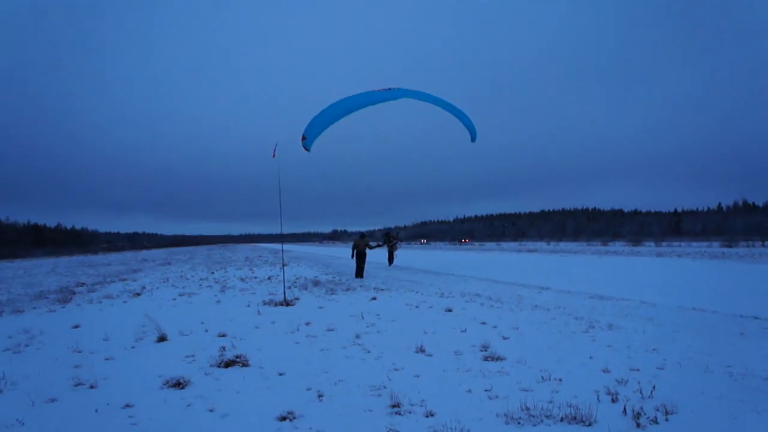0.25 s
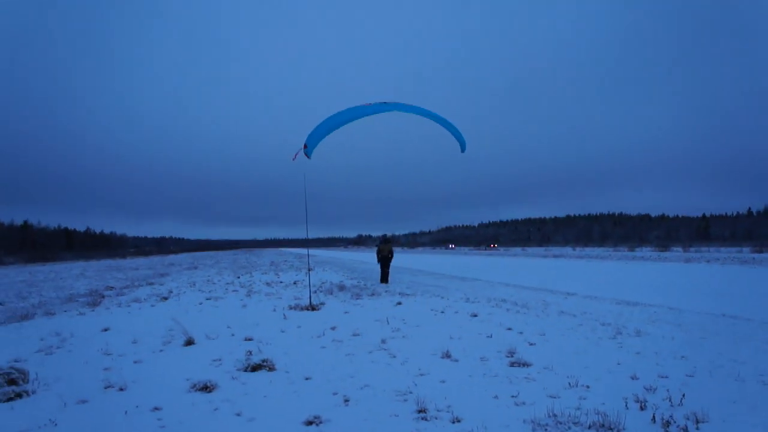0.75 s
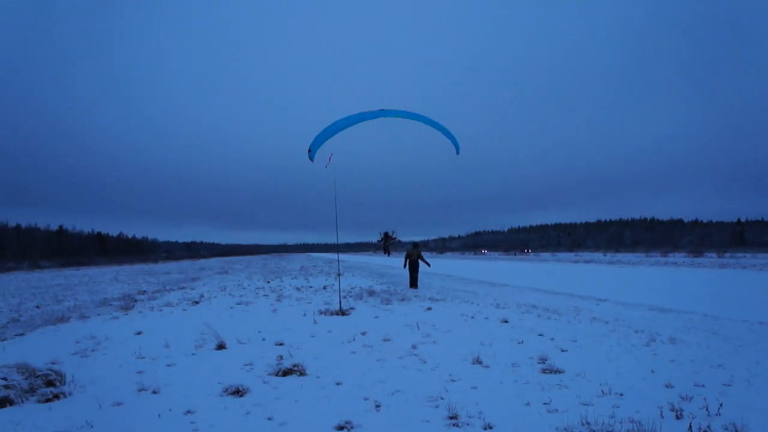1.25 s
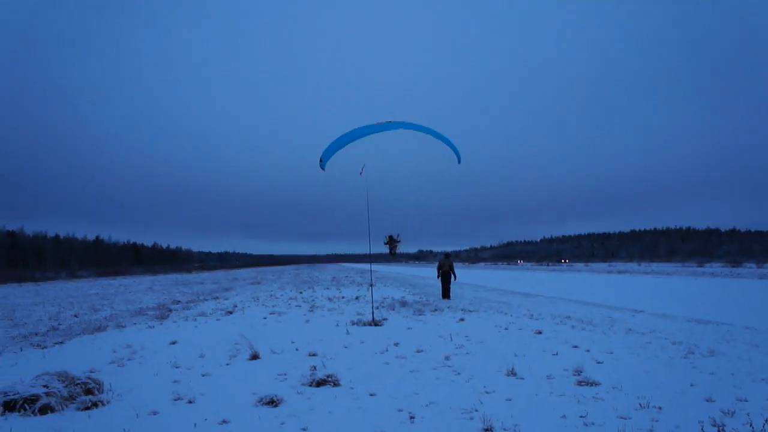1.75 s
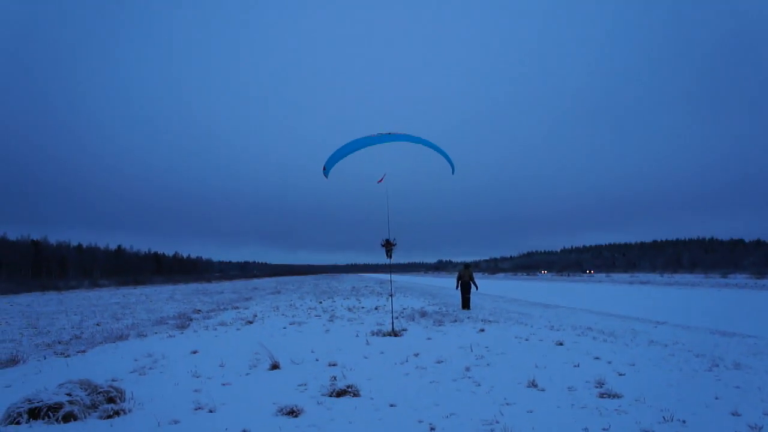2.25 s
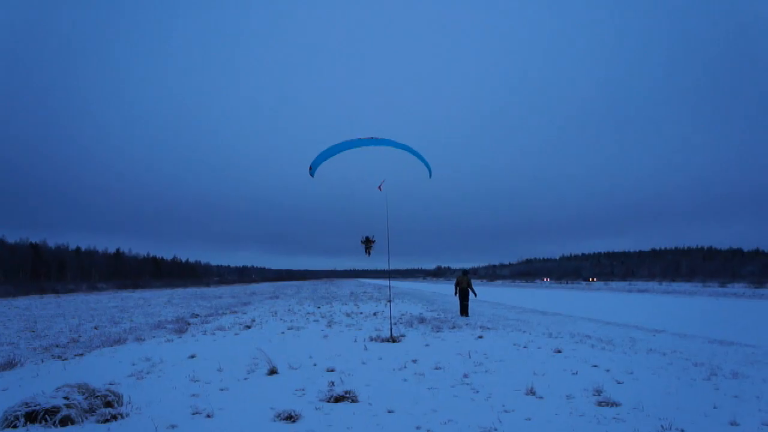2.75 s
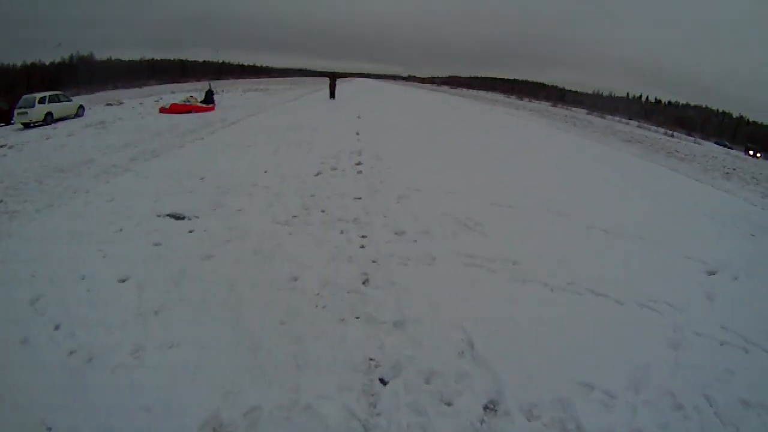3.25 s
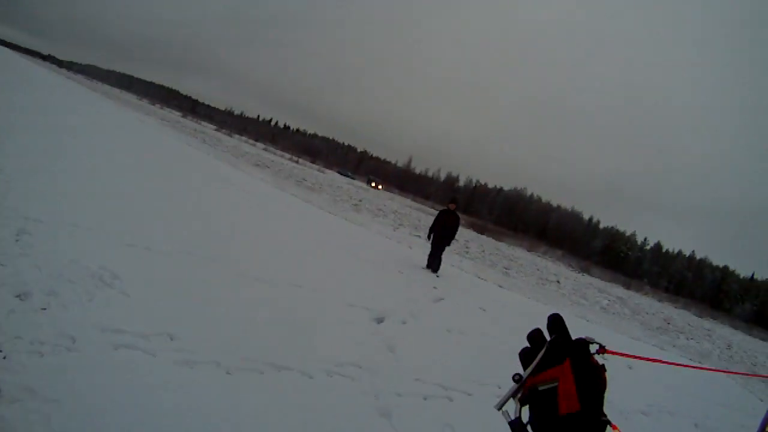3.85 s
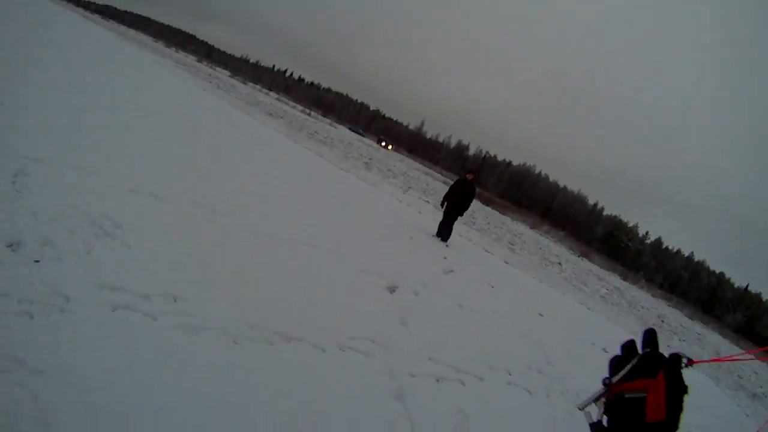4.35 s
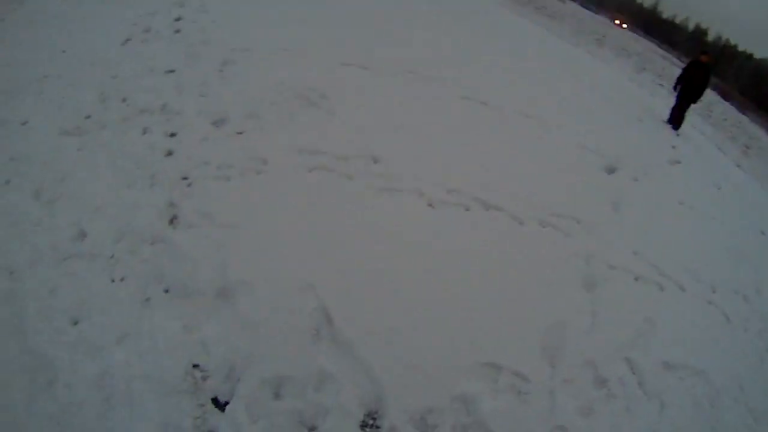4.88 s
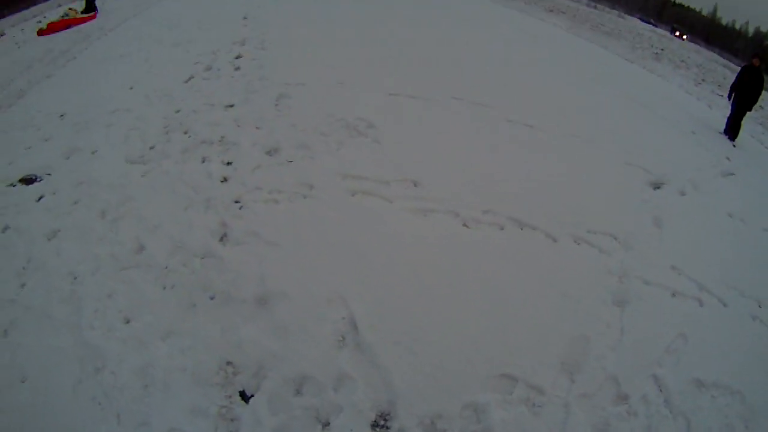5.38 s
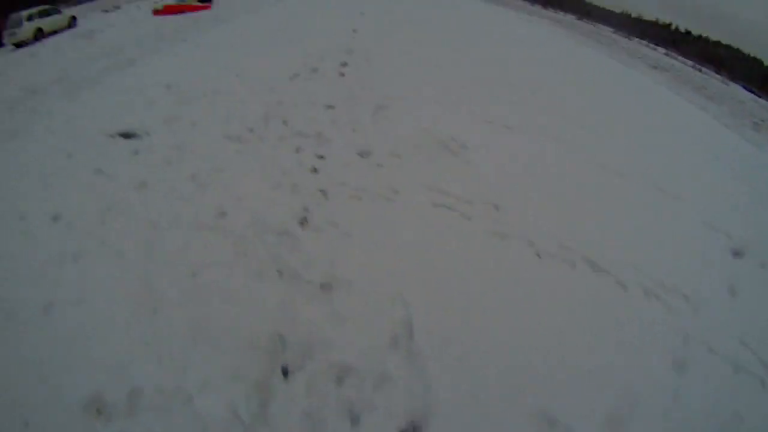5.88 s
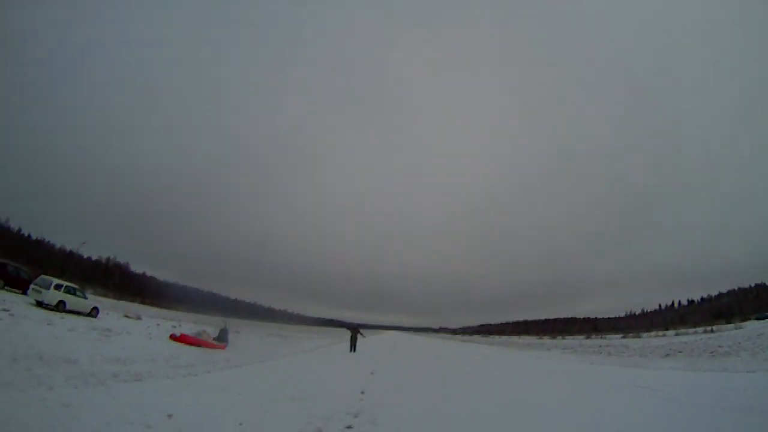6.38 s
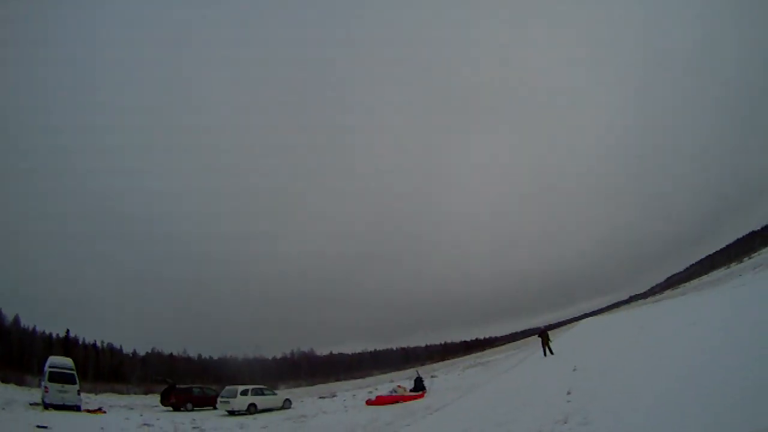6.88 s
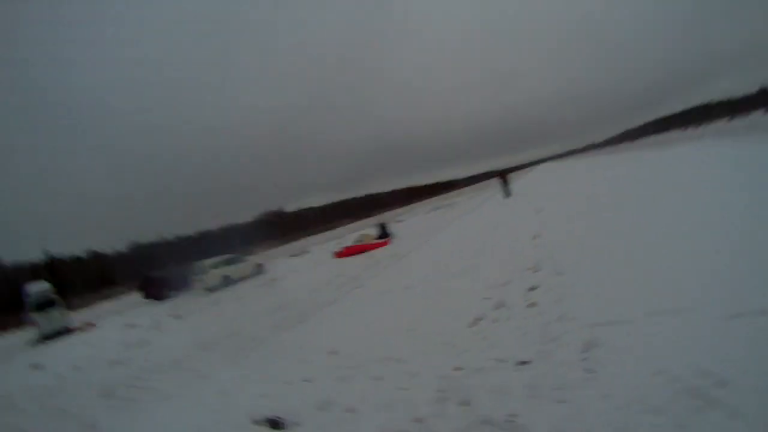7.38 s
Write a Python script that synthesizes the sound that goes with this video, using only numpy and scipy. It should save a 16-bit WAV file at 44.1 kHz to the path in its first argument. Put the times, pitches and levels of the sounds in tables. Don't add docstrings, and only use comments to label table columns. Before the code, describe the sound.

Full-throttle paramotor drone with blade slap and wind rumble, cut hard at three seconds to a muffled, irregular popping idle with knocks and ticks.

```python
import sys
import numpy as np
from scipy import signal
from scipy.fft import rfft, irfft, next_fast_len
from scipy.io import wavfile
from scipy.ndimage import uniform_filter1d

SR = 44100
rng = np.random.default_rng(int(sys.argv[2]) if len(sys.argv) > 2 else 0)


def unload_audio(sound):
    columns = np.transpose(np.atleast_2d(sound))
    steps = np.round(np.clip(columns, -1, 1) * 32767)
    wavfile.write(sys.argv[1], SR, steps.astype(np.int16))


def gain_from_decibels(decibels):
    exponent = np.asarray(decibels, float) / 20
    return 10 ** exponent


N = 336306
CUT_S = 2.9853
RISE_S = (1.37, 2.22)
CLEAR_S = (1.35, 1.8)
IDLE_HZ = 48.54

# frequency in Hz, left-right likeness 0-1.
EAR_LIKENESS = [(60, 0.057), (130, 1), (270, 0.46), (560, 1), (1190, 0.88), (2520, 0.15), (5310, 0.86),
                (11200, 0.56)]
# frequency in Hz, left minus right in dB.
EAR_LEAN = [(60, -2), (110, -1.5), (190, 6.5), (340, -1), (610, 4.5), (1100, 4.5), (1960, 2), (3510, -4.5),
            (6270, 3.5), (11200, 0)]
# start in seconds, peak in dB, crack minus peak in dB.
FIRINGS_ASIDE = [(3.003, -30, -9.5), (3.089, -45.5, 6), (3.192, -26, -8), (3.296, -25, -12),
                 (3.463, -25, -13), (3.562, -27, -6), (3.644, -26, -7), (3.722, -33.5, -3),
                 (3.789, -28, -8), (3.956, -24, -9.5), (4.078, -25, -10), (4.242, -25.5, -4.5),
                 (4.358, -25, -6), (4.454, -27.5, -9.5), (4.596, -30, -7), (4.691, -39, -4),
                 (4.761, -26.5, -5.5), (4.842, -26.5, -7.5), (5.179, -37.5, -4.5), (5.323, -32.5, -8),
                 (5.53, -32.5, -9), (5.632, -29, -13), (5.734, -36, -5.5), (5.818, -31, -8.5),
                 (5.923, -32.5, -14), (6.005, -31, -8)]
# start in seconds, peak in dB, crack minus peak in dB.
FIRINGS_STRAIGHT = [(6.132, -35, -3), (6.335, -31, -3), (6.436, -25.5, -8), (6.517, -25, -8),
                    (6.761, -21.5, -11), (7.019, -24, -10), (7.099, -24, -9.5), (7.193, -25.5, -9),
                    (7.288, -32.5, -15), (7.33, -31.5, -7), (7.465, -27.5, -9.5), (7.516, -35, -27),
                    (7.547, -41, -3)]
# frequency in Hz, width in Hz, level in dB.
BOX_MODES = [(826, 110, 5), (1087, 140, -4), (636, 61, -3)]
# frequency in Hz, width in Hz, level in dB.
CASING_MODES = [(3080, 210, 3.5), (3406, 220, 7), (3715, 106, 5.5), (4210, 250, 4.5), (5010, 170, 2),
                (5700, 140, 2.5), (6160, 63, 3), (6530, 250, 0.5), (7260, 260, -1), (7820, 91, -0.5),
                (8330, 120, -4.5), (9170, 160, -12)]


def rms_one(x):
    return x / np.sqrt(np.mean(x ** 2) + 1e-20)


def in_time(rows, count):
    s, *columns = np.transpose(rows)
    return [np.interp(np.arange(count) / SR, s, c) for c in columns]


def ramp(limits_s, times):
    return np.interp(times, limits_s, (0, 1))


def at_hz(points, hz):
    table_hz, value = np.transpose(points)
    return np.interp(np.log(np.maximum(hz, 1)), np.log(table_hz), value)


def bumps(rows, times, gain_of):
    return sum(gain_of(db) * np.exp(-.5 * ((times - s) / half_s) ** 2) for s, db, half_s in rows)


def drift(rate, count, channels=1):
    r = np.exp(-128 * np.pi * rate / SR)
    white = rng.standard_normal((channels, count // 64 + 1002))
    slow = signal.lfilter([1], [1, -2 * r, r * r], white)[:, 1000:]
    return np.repeat(slow / slow.std(), 64, axis=1)[:, :count]


def coloured(x, spectrum):
    size = next_fast_len(x.shape[-1])
    gain = gain_from_decibels(at_hz(spectrum, np.arange(size // 2 + 1) * SR / size))
    return rms_one(irfft(rfft(x, size) * gain, size)[..., :x.shape[-1]])


def third_octave(low_hz, high_hz):
    return signal.butter(2, [low_hz, high_hz], "band", fs=SR, output="sos")


def band(x, low_hz, high_hz):
    return rms_one(signal.sosfilt(third_octave(low_hz, high_hz), x))


def resonate(x, modes):
    out = 0
    for k, (hz, width, db) in enumerate(modes):
        r = np.exp(-np.pi * width / SR)
        top = [(1 - r * r) / 2, 0, (r * r - 1) / 2]
        bottom = [1, -2 * r * np.cos(2 * np.pi * hz / SR), r * r]
        out = out + (-1) ** k * gain_from_decibels(db) * signal.lfilter(top, bottom, x)
    return out


def dying(clicks, t60):
    return signal.lfilter([1], [1, -gain_from_decibels(-60 / (t60 * SR))], clicks + 1e-12)


def clicks_at(times, db):
    out = np.zeros(N)
    out[np.minimum(np.round(np.asarray(times) * SR).astype(int), N - 1)] = gain_from_decibels(np.asarray(db))
    return out


def slap_multiples():
    # multiple of the blade pass rate, level in dB.
    near = [(1, -16.5), (2, -3.5), (3, -10), (4, -18), (5, -20), (6, -8.5), (7, -7), (8, -0.5), (9, -3.5),
            (10, -1), (11, 3), (12, -2.5), (13, -1.5), (14, -5.5), (15, -9), (16, -16), (17, -11), (18, -7),
            (19, -3), (20, -9), (21, -5), (22, -6), (23, -8.5), (24, -6), (25, -3), (26, -8.5)]
    # multiple of the blade pass rate, level in dB.
    aloft = [(1, -23.5), (2, -7.5), (3, -13), (4, -10.5), (5, -14.5), (6, -3.5), (7, -8), (8, -6), (9, -4),
             (10, -21), (11, -1), (12, -11), (13, -6), (14, -7.5), (15, -19), (16, -50), (17, -41),
             (18, -17)]
    higher = [(n, -9.5 - 0.98 * (n - 27) + 2 * rng.standard_normal()) for n in range(27, 49)]
    high = dict(aloft)
    rows = []
    for order, db in near + higher:
        loss_db = 16.0 if order < 27 else 2.0
        rows.append((order, db, high.get(order, db - loss_db) + 4.0))
    return rows


def eddy_lift(order, hz, times):
    # time in seconds, centre in Hz, gain in dB, half length in seconds, half width in Hz.
    lobes = [(0.18, 800, -8, 0.065, 135), (0.15, 1880, 7.5, 0.058, 67), (.14, 1410, 8, 0.024, 110),
             (0.24, 845, 12, 0.059, 138), (0.3, 2130, 2, 0.038, 94), (0.28, 765, -27, 0.14, 44),
             (0.46, 1400, 10, 0.065, 99), (0.453, 1500, 4, 0.021, 140), (0.47, 1300, 13, 0.0086, 130),
             (0.64, 440, -4.5, 0.067, 110), (0.674, 480, 7.5, 0.05, 260), (0.67, 1660, -5.5, 0.041, 96),
             (0.966, 1780, 7, 0.077, 126), (0.94, 1120, 6.5, 0.17, 135), (0.98, 790, 5, 0.054, 150),
             (1.08, 1335, 8, 0.044, 67), (1.37, 1020, -5, 0.035, 81), (1.17, 1500, 3, 0.079, 72),
             (1.503, 900, 3.5, 0.027, 61), (1.6, 1930, -7.5, 0.15, 100), (1.56, 1020, 3, 0.34, 65),
             (1.945, 710, 3.5, 0.042, 160), (1.99, 400, -15, 0.081, 74), (2.1, 580, -13, 0.034, 79),
             (2.15, 860, 6.5, 0.089, 40), (1.7, 2060, -4, .1, 60), (2, 490, 6, 0.099, 25),
             (2.503, 635, 7, 0.051, 99), (2.796, 464, 7, 0.085, 37), (2.692, 840, -15.5, 0.051, 64),
             (2.83, 915, 18.5, 0.19, 27), (3, 780, 5, 0.18, 26), (2.98, 2220, 5.5, 0.17, 230),
             (2.925, 1480, 10.5, 0.083, 69), (2.34, 3450, 14, 0.36, 350), (0.22, 1470, -2.5, .06, 120),
             (2.77, 828, 6, 0.093, 23), (2.3, 840, 2, 0.09, 25), (0.39, 3400, 13, 0.4, 380),
             (1.27, 378, 9.5, 0.055, 28), (0.83, 1760, 2, 0.1, 76), (0.73, 556, 6, 0.11, 34),
             (2.93, 920, 7, 0.045, 58)]
    # time in seconds, multiple, gain in dB, half length in seconds.
    swaps = [(0.11, 21, 7, 0.043), (0.232, 25, 11, 0.019), (0.43, 10, 12, 0.044), (0.47, 19, -12.7, 0.043),
             (0.62, 18, 5, 0.28), (0.655, 21, 13, 0.035), (0.66, 22, -10.7, 0.035), (0.703, 11, -8, 0.016),
             (0.71, 25, -13.4, 0.04), (0.79, 20, 3, 0.17), (0.946, 14, -8, 0.17), (0.962, 21, 9, 0.028),
             (0.997, 16, 4, 0.18), (1.07, 10, 6, 0.05), (1.14, 12, -5, 0.022), (1.175, 11, -17, 0.018),
             (1.21, 22, -13, 0.2), (1.347, 23, 8, 0.19), (1.476, 9, 5.5, 0.025), (1.488, 21, -9, 0.22),
             (1.767, 8, -17, 0.023), (2.13, 26, 10.7, 0.26), (2.14, 18, -9.7, 0.12),
             (2.363, 11, -16, 0.019), (2.467, 6, -8, 0.061), (2.608, 8, -16, 0.057), (2.72, 20, -14, 0.063),
             (2.797, 10, 19.5, 0.094), (2.96, 21, 6, 0.16), (2.98, 11, -19, 0.12)]
    # time in seconds, multiple, gain in dB, half length in seconds.
    echo_nulls = [(0.54, 6, -12, .03), (1.22, 6, -12, .02), (1.98, 6, -13, 0.047), (2.2, 9, 4, 0.16),
                  (2.19, 11, -3, 0.055), (0.31, 8, 4.5, 0.052), (1.07, 3, 5.5, 0.11), (1.22, 13, -2, 0.054),
                  (2.27, 13, -1, 0.077)]
    group = [(s, db * np.exp(-.5 * ((hz - lobe_hz) / half_hz) ** 2), half_s)
             for s, lobe_hz, db, half_s, half_hz in lobes]
    single = [(s, db, half_s) for s, multiple, db, half_s in swaps + echo_nulls if multiple == order]
    return bumps(group + single, times, float)


def exhaust_ring(order, passes, ring_db, ring_hz, width_hz, below):
    sweep = 0.62
    ring = gain_from_decibels(ring_db - 3.5) / (1 + 2j * (order * passes - ring_hz) / width_hz) ** 2
    return ring * np.exp(1j * sweep * below ** 2 * (order - ring_hz / passes) ** 2)


def propeller(count):
    # time in seconds, blade passes per second.
    pass_rate = [(0.0, 78.4), (1.26, 78.2), (1.63, 77.7), (2.14, 77.6), (2.52, 78.3), (2.62, 78.0),
                 (2.98, 78.2)]
    # time in seconds, blade slap in dB, exhaust ring in dB, ring centre in Hz,
    # clearness of the air path in dB.
    path = [(0.0, -19, -22, 1560, -3), (0.15, -20.5, -21, 1380, -1.5), (0.4, -21, -22, 1540, -3),
            (0.7, -21.5, -24, 1667, -4.5), (1.05, -17, -27, 1430, -4.5), (1.4, -18.5, -25.5, 1730, 0),
            (1.75, -19, -15, 1657, -3), (2.05, -20, -16, 1650, -4.5), (2.3, -22, -12, 1697, -2.5),
            (2.6, -23, -13.5, 1730, -6.5), (2.98, -23.5, -17.5, 1753, -6.5)]
    # time in seconds, depth in dB, half length in seconds.
    fades = [
        (0.0, -5, .08),
        (0.96, -13, .06),
        (2.45, -9, .22),
    ]
    # time in seconds, gain in dB, half length in seconds.
    surges = [(0.478, 9, 0.0038), (0.657, 4, 0.0051), (1.003, -3.5, 0.1), (1.105, 3.5, 0.0057),
              (1.15, -3.5, 0.023), (1.512, 0.5, 0.014), (1.73, 2, 0.04)]
    # time in seconds, width in Hz.
    ring_width = [(0.0, 260), (1.35, 260), (1.8, 125), (2.3, 120), (2.6, 160), (2.98, 240)]
    thump_db, tip_hiss_db = -30.5, -21.5
    twinkle_db, flutter_db = 1.6, 1.6
    wander, spread, slap_sweep, echo_scatter = 0.32, 0.3, .07, .9
    half_share = 0.13

    full_passes = in_time(pass_rate, count)[0]
    turn = 2 * np.pi * np.cumsum(full_passes) / SR - 0.8
    slap_db, ring_db, ring_hz, clear_db = in_time(path, count)
    at = np.arange(0, count, 64)
    times, below, passes = at / SR, at / count, full_passes[at]
    risen, clear = ramp(RISE_S, times), ramp(CLEAR_S, times)
    width_hz = in_time(ring_width, count)[0][at]
    second_db = thump_db + bumps(fades, times, float) + 7.5
    surge_db = bumps(surges, times, float)
    loose = gain_from_decibels(-1.5 * surge_db)

    eddies = np.clip(drift(3, count, channels=192)[:, ::64].reshape(4, 48, -1), -1.6, 1.6)
    flutter = drift(11, count, channels=96)[:, ::64].reshape(2, 48, -1)
    flutter = uniform_filter1d(flutter, size=5, axis=1) * np.sqrt(5)
    scatter = rng.standard_normal(48)

    rotor, half_step = np.ones(count, complex), np.exp(.5j * turn)
    out = np.zeros((2, count))
    for k, (order, near_db, high_db) in enumerate(slap_multiples()):
        rotor = rotor * half_step ** 2
        hz = order * passes[0]
        low = min(order / 3, 1)

        db = near_db + (clear if order > 18 else risen) * (high_db - near_db)
        if order < 2:
            db = db + thump_db + 6.5
        elif order < 3:
            db = db + second_db
        else:
            db = db + slap_db[at] - 6.5
        db = db + np.clip(order / 8, 0, 1) * (flutter_db * flutter[0, k] + surge_db * (8 < order < 24))
        db = db + twinkle_db * min(order / 7, 1) * eddies[0, k]
        lag = spread * min(order, 14) / 10 * scatter[k] * loose + slap_sweep * min(order - 11, 0) ** 2
        lag = lag - 1.2 + echo_scatter * risen * scatter[-k]
        slap = gain_from_decibels(db) * np.exp(1j * lag)

        lift_db = eddy_lift(order, hz, times)
        apart = np.sqrt(np.clip(1 - at_hz(EAR_LIKENESS, hz), 0, 1))
        steady = 1 - 0.7 * clear * (18 < order < 27)
        common = wander * np.sqrt(order / 10) * (eddies[2, k] + 0.5 * flutter[1, k]) * loose * steady
        for share, shift in ((1, 0), (half_share, .5)):
            if shift and not 17 < order < 26:
                continue
            z = exhaust_ring(order + shift, passes, ring_db[at], ring_hz[at], width_hz, below)
            z = z * np.exp(4j * shift * scatter[k])
            if not shift:
                z = z + slap
            carrier = rotor * half_step if shift else rotor
            for ear, sign in enumerate((1, -1)):
                level_db = sign * (0.5 * low * apart * eddies[1, k] + at_hz(EAR_LEAN, hz) / 2)
                phase = common + 0.52 * sign * apart * (1.6 * low * steady * eddies[3, k] + 1)
                heard = share * z * gain_from_decibels(level_db + lift_db) * np.exp(1j * phase)
                out[ear] += (np.interp(np.arange(count), at, heard) * carrier).real
    return out, turn, tip_hiss_db + clear_db, (slap_db + ring_db) / 2


def blade_wash(turn, hiss_db, body_db):
    # frequency in Hz, level in dB per Hz.
    wash = [(24, -51), (40, -51), (106, -11), (155, -7), (418, -27), (463, -13.5), (699, 5.5), (788, -2.5),
            (859, 3), (1230, -2.5), (1670, 3.5), (2400, -5), (3120, -46), (5280, -120)]
    # frequency in Hz, level in dB per Hz.
    hiss = [(1290, -30), (2200, 0), (2690, -0.5), (3230, -9), (4010, -5), (5040, -9.5), (6730, -15.5),
            (9610, -15), (11000, -30), (14300, -60), (22000, -120)]
    throb, tip_throb, thins_db, patchy_db = 0.027, 0.3, -4, 1.0
    count = len(turn)
    times = np.arange(count) / SR
    risen, clear = ramp(RISE_S, times), ramp(CLEAR_S, times)
    edges, both = 40 * 2 ** np.arange(0, 8.5, 1 / 3), np.array([[1], [-1]])
    white, patches = rng.standard_normal((2, 2, count)), drift(23, count, channels=26)
    out = 0
    for k, (low, high) in enumerate(zip(edges, edges[1:])):
        mid, side = signal.sosfilt(third_octave(low, high), white[k % 2])
        hz = np.sqrt(low * high)
        if hz > 2300:
            level_db = at_hz(hiss, hz) + hiss_db + 4.5
            if hz < 4200:
                level_db = level_db + tip_throb * 20 / np.log(10) * np.cos(turn)
        else:
            level_db = at_hz(wash, hz) + .5 * body_db - 5.5
            level_db = level_db + thins_db * (hz > 500) * clear
        level_db = level_db + 1.5 * (3000 < hz < 3800) * risen
        level_db = level_db + patchy_db * (patches[k] + 0.72 * patches[25])
        gain = gain_from_decibels(level_db + at_hz(EAR_LEAN, hz) / 2 * both)
        alike = np.clip(at_hz(EAR_LIKENESS, hz), 0, 1)
        out = out + gain * (np.sqrt(1 + alike) * mid + np.sqrt(1 - alike) * side * both)
    return out * np.exp(throb * (np.cos(turn) + .5 * np.cos(2 * turn)))


def gear_whine(count):
    # time in seconds, frequency in Hz, level in dB.
    whine = [
        (0.0, 4580, -43),
        (0.448, 4560, -39),
        (0.5, 4560, -45),
    ]
    hz, db = in_time(whine + [(.53, whine[-1][1], -70)], count)
    phase = 2 * np.pi * np.cumsum(hz) / SR + 0.8 * drift(8.0, count)[0]
    return gain_from_decibels(db + 4.5 * drift(14.0, count)[0]) * np.cos(phase)


def port_wind(count):
    # time in seconds, level in dB.
    breeze = [(0.0, -60), (1.3, -51), (2.98, -52)]
    # time in seconds, peak in dB, half length in seconds.
    gusts = [(0.43, -42, 0.021), (0.86, -30.5, 0.014), (1.41, -29.5, 0.019), (1.79, -36.5, 0.15),
             (1.96, -35.5, 0.019), (2.13, -34.5, 0.033), (2.36, -45, 0.033), (2.49, -46, 0.063),
             (2.6, -33, 0.056), (2.84, -28, 0.033), (2.96, -41, 0.032)]
    lumps = gain_from_decibels(5.7 * drift(6.0, count, channels=2))
    level = gain_from_decibels(in_time(breeze, count)[0]) + bumps(gusts, np.arange(count) / SR, gain_from_decibels)
    rumble = band(rng.standard_normal((2, count)) * lumps, 43, 900)
    return gain_from_decibels(4.5) * level * band(rumble, 67, 247)


def climb():
    count = round(CUT_S * SR)
    tones, turn, hiss_db, body_db = propeller(count)
    field = tones + blade_wash(turn, hiss_db, body_db) + port_wind(count) + gear_whine(count)
    low_pass = signal.ellip(14, .5, 85, 11150, fs=SR, output="sos")
    field = signal.sosfilt(low_pass, 1.3 * np.tanh(field / 1.3))
    fade = np.minimum(np.arange(count, 0, -1) / (0.0002 * SR), 1)
    return np.pad(field * fade, ((0, 0), (0, N - count)))


def all_firings():
    # start in seconds, peak in dB.
    weak = [(3.118, -64), (3.925, -80), (4.026, -82), (4.053, -31), (4.643, -45), (5.116, -39),
            (5.655, -41), (5.708, -30), (6.051, -34), (6.226, -48), (6.672, -51), (6.927, -29),
            (7.144, -29), (4.16, -46), (6.27, -32), (6.391, -45)]
    rows = [(s, db, 1403, crack_db, 0) for s, db, crack_db in FIRINGS_ASIDE]
    rows += [(s, db, 1544, crack_db, 0) for s, db, crack_db in FIRINGS_STRAIGHT]
    rows += [(s, db, 1730, -18, -5.5) for s, db in weak]
    return np.transpose(sorted(rows))


def firings():
    s, db, ring_hz, crack_db, box_db = all_firings()
    white, luck = rng.standard_normal((3, N)), rng.standard_normal((len(s), 2))
    ring_hz = ring_hz * (1 + 0.0044 * luck[:, 0])
    box_db = box_db - 16 - 3.5 * luck[:, 1]
    out = np.zeros(N)
    for at, level_db, hz in zip(np.round(s * SR).astype(int), db, ring_hz):
        t = np.arange(min(3000, N - at)) / SR
        burst = white[0, at:at + len(t)] * gain_from_decibels(-60 * t / 0.14)
        burst[0] += 22.0
        silencer = [(hz, 70, 0), (hz * 1.16, 110, -4), (hz * 1.16, 200, -6)]
        out[at:at + len(t)] += gain_from_decibels(level_db + 6.5) * resonate(burst, silencer)
    pops = clicks_at(s, db + box_db)
    out += gain_from_decibels(11.0) * resonate(11.5 * pops + white[1] * dying(pops, 0.16), BOX_MODES + [(1057, 81, 2.5)])
    crack = dying(dying(clicks_at(s, db + crack_db), 0.07), 0.014) / 190
    casing = CASING_MODES + [(3280, 170, -11.0), (11400, 7100, -13.5)]
    out += gain_from_decibels(10.5) * resonate(white[2] * crack, casing)
    out = out + gain_from_decibels(-13) * np.roll(out, round(SR / IDLE_HZ))
    return signal.sosfilt(signal.butter(4, 11500, fs=SR, output="sos"), out)


def idle_cycles(spread_db):
    firing_s = np.transpose(FIRINGS_ASIDE + FIRINGS_STRAIGHT)[0]
    marks = np.concatenate([[CUT_S - .02], firing_s, [N / SR]])
    turns = np.cumsum(np.maximum(np.round(np.diff(marks) * IDLE_HZ), 1))
    times = np.interp(np.arange(turns[-1]), np.append(0, turns), marks)
    return clicks_at(times, spread_db * rng.standard_normal(len(times)))


def idle_silencer(cycles, puffs, half_turn, turned):
    # frequency in Hz, width in Hz, level in dB.
    side_modes = [(1418, 34, 5.5), (1544, 117, 1.5), (1703, 115, 3.5), (1935, 60, 0), (2167, 38, -4)]
    # frequency in Hz, width in Hz, level in dB.
    back_modes = [(1523, 22, -5), (1650, 70, 7.5), (1940, 210, -6), (835, 60, 3), (2700, 600, -11)]
    white = rng.standard_normal(N)
    side = rms_one(resonate(white * (2.2 + puffs), side_modes))
    port = white * (.25 + .6 * np.roll(puffs, half_turn)) + 90.0 * np.roll(cycles, half_turn)
    back = rms_one(resonate(port, back_modes))
    s, db = all_firings()[:2]
    rundown = 0.81 + 0.5 * dying(clicks_at(s, np.minimum(db + 28.5, 0)), 0.48)
    aside = turned ** 2.5
    return aside * side * rundown + (1 - aside) * back


def idle_casing(puffs, turned):
    white = rng.standard_normal(N)
    low_gain = (0.24 + 1.18 * turned) * gain_from_decibels(0.27 * drift(13.0, N)[0])
    low = low_gain * resonate(white * (2.74 + puffs), CASING_MODES[:3])
    high = resonate(white * (4.8 + puffs), CASING_MODES[3:])
    return gain_from_decibels(1.6 * drift(6.6, N)[0]) * rms_one(high + low)


def harness_thud(half_turn):
    # frequency in Hz, width in Hz, level in dB.
    modes = [(190, 28, -2), (234, 21, 0.5), (312, 66, 5), (377, 77, -3.5)]
    strokes = idle_cycles(2.2)
    early = resonate(np.roll(strokes, -half_turn), modes[:2])
    thud = gain_from_decibels(-70.5) * rms_one(early + resonate(strokes, modes[2:]))
    s, db = all_firings()[:2]
    return thud + resonate(clicks_at(s, np.minimum(db, -32.0)), [(370, 42, 20.0)])


def hollow_hum():
    # time in seconds, level in dB.
    hollow = [(2.99, -58.5), (4.7, -58.5), (5.1, -73), (6.2, -92), (6.55, -68), (6.88, -65), (6.98, -63),
              (7.63, -58.5)]
    s, db = all_firings()[:2]
    swell = dying(dying(clicks_at(s + 0.023, db), 0.12), 0.047)
    tone = np.cos(2 * np.pi * 543 * np.arange(N) / SR + .9 * drift(9.0, N)[0])
    strength = .7 * gain_from_decibels(5.5 * drift(13.0, N)[0]) + rms_one(swell)
    return gain_from_decibels(in_time(hollow, N)[0]) * tone * strength


def idle_running():
    # time in seconds, motor level in dB, turned away 0-1, open casing in dB.
    head = [(2.99, -48.5, 1, 4), (3.11, -44, 1, -5.5), (3.57, -44, 1, -1.5), (3.79, -45, 0.9, 2.5),
            (4.0, -43, 0.67, -1), (4.65, -46.5, 1, 2), (5.21, -54.5, 0.97, 0.5), (5.42, -58.5, 1, 4.5),
            (5.71, -52.5, 1, 0), (6.06, -52.5, 0.85, 1), (6.16, -42, 0.8, -3.5), (6.55, -40, 0.83, -5),
            (7.08, -40.5, 0.7, -4.5), (7.63, -43, 0.98, -6)]
    # frequency in Hz, level in dB per Hz.
    bed_spectrum = [(70, -42), (110, -23), (330, -12.5), (470, -18.5), (1200, -8.5), (2500, -21.5),
                    (5000, -20), (9000, -26.5), (12000, -28.5), (13600, -31.5), (15200, -49)]
    silencer_db, turned, open_db = in_time(head, N)
    hiss_db, turned = silencer_db + open_db, np.clip(turned, 0, 1)
    half_turn = round(SR / IDLE_HZ / 2)
    cycles = idle_cycles(1.8)
    puffs = rms_one(dying(dying(cycles, .04), .015))
    white = rng.standard_normal((3, N))

    silencer = gain_from_decibels(silencer_db - 2.5) * idle_silencer(cycles, puffs, half_turn, turned)
    casing = gain_from_decibels(hiss_db - 3.5) * idle_casing(puffs, turned)
    box = rms_one(resonate(white[0] * (0.5 + puffs) + 32.0 * cycles, BOX_MODES))
    box = gain_from_decibels(hiss_db - 11 + 0.91 * (1 - turned)) * box
    bed = gain_from_decibels(0.5 * (hiss_db - hiss_db[-1]) - 56.5) * coloured(white[1] * (15.0 + puffs), bed_spectrum)
    intake_db = -69 + 3.15 * (silencer_db + .5 * open_db + 47)
    intake = gain_from_decibels(intake_db) * band(white[2] * (2.0 + puffs), 5500, 10000)
    return silencer + casing + box + bed + intake + harness_thud(half_turn) + hollow_hum()


def rattles():
    # start in seconds, peak in dB.
    snaps = [(3.2334, -30), (3.3144, -27), (3.3363, -32), (3.482, -27), (3.5209, -30), (3.5814, -27),
             (3.6026, -28), (3.7274, -36), (3.8606, -32), (3.903, -31), (4.1016, -32), (4.3001, -30),
             (4.342, -28), (4.597, -28), (4.6194, -30), (6.5405, -32), (6.8568, -29), (7.2, -30)]
    s, db = np.transpose(snaps)
    contacts = clicks_at(s, db) - clicks_at(s + 0.00121, db - 7.0)
    return gain_from_decibels(17.0) * resonate(contacts, CASING_MODES[:9] + [(1900, 200, 0.0)])


def knocks():
    # start in seconds, peak in dB.
    blows = [(4.2663, -34), (4.646, -38), (4.89, -34), (5.0023, -40.5), (5.1172, -37.5), (5.281, -36.5),
             (5.7089, -27), (5.8297, -37.5), (5.947, -40)]
    # frequency in Hz, level in dB, 60 dB decay in seconds.
    part_modes = [(1244, -8.5, 0.028), (1443, 2, 0.049), (1770, 1, 0.026), (2073, -6, 0.027)]
    s, db = np.transpose(blows)
    hits = clicks_at(s, db) - clicks_at(s + 0.00359, db - 4.0) + clicks_at(s + 0.0033, db - 16)
    return gain_from_decibels(38.0) * resonate(hits, [(hz, 1.6 / t60, db) for hz, db, t60 in part_modes])


def ticks():
    # start in seconds, peak in dB, main frequency in Hz.
    contacts = [
        (5.0654, -26.5, 6740),
        (5.0735, -32, 6800),
        (6.8675, -26.5, 7600),
    ]
    out, t = np.zeros(N), np.arange(2000) / SR
    others = [(4600, 700, -4), (11700, 700, -11), (1900, 700, -6), (3300, 600, -10)]
    for s, db, hz in contacts:
        burst = rng.standard_normal(len(t)) * gain_from_decibels(db - 60 * t / 0.038)
        out[round(s * SR):][:len(t)] += resonate(burst, [(hz, 900, 2.5)] + others)
    return out


def helmet_wind():
    # time in seconds, peak in dB, half length in seconds.
    gusts = [(3.4, -75, 0.13), (4.1, -90, 0.18), (4.72, -78, 0.067), (5.9, -80, .25), (6.45, -70, 0.094),
             (6.98, -69, 0.18), (7.63, -73, .1)]
    level = gain_from_decibels(-84) + bumps(gusts, np.arange(N) / SR, gain_from_decibels)
    return level * band(rng.standard_normal(N), 4.4, 84)


def scene():
    helmet = firings() + idle_running() + rattles() + knocks() + ticks() + helmet_wind()
    return climb() + helmet * (np.arange(N) >= round(CUT_S * SR))


def top_cut(x):
    return signal.sosfilt(signal.butter(12, 15450, fs=SR, output="sos"), x)


def record(dry):
    return top_cut(np.clip(dry, -.93, .93))


dry = scene()
out = record(dry)
unload_audio(out)
```